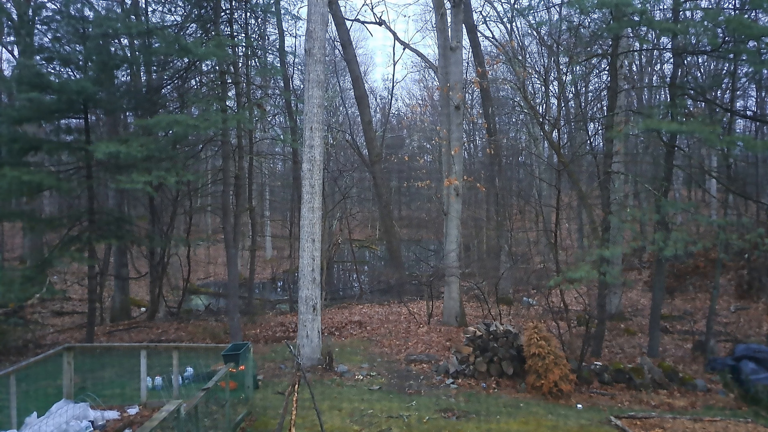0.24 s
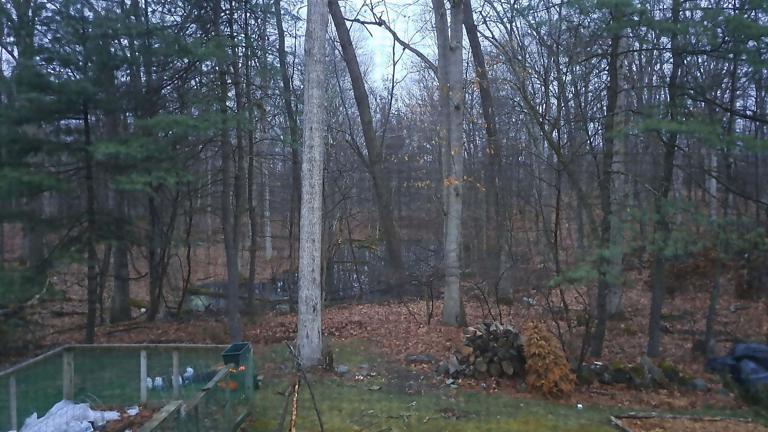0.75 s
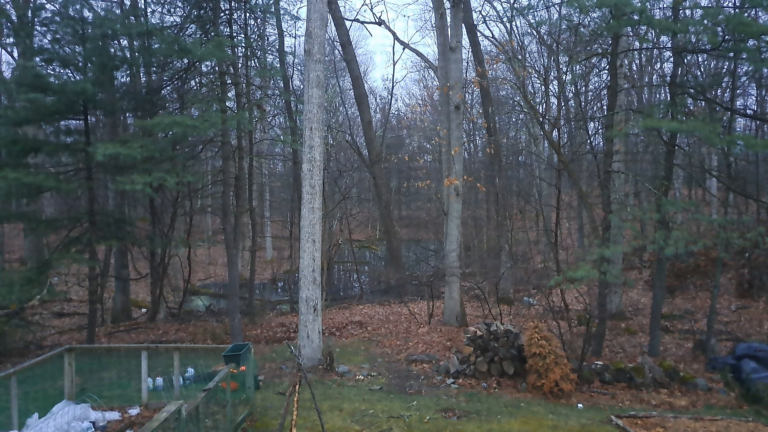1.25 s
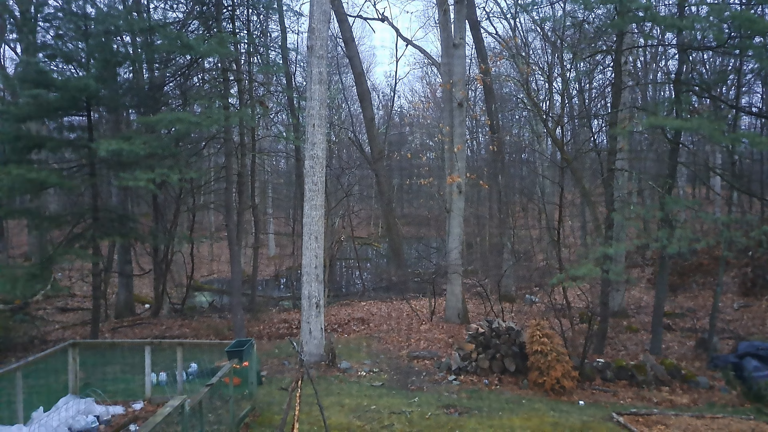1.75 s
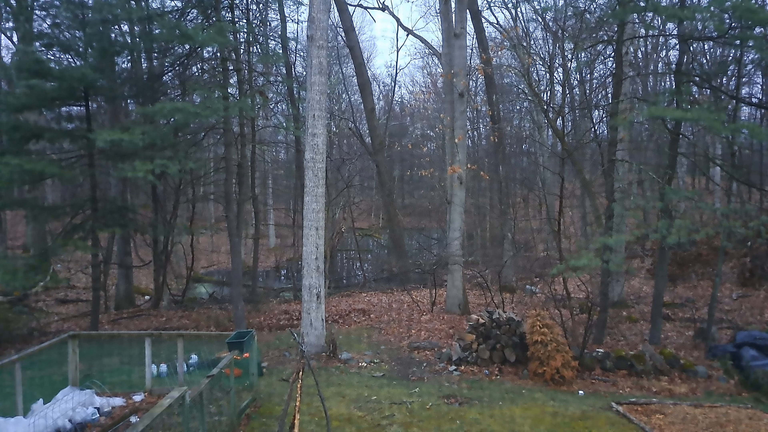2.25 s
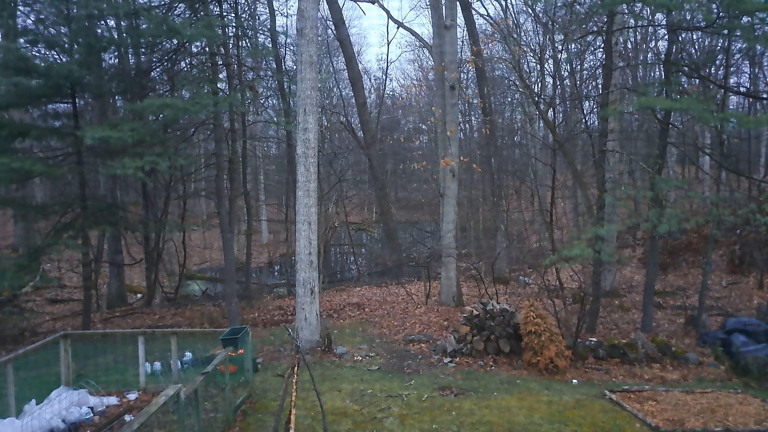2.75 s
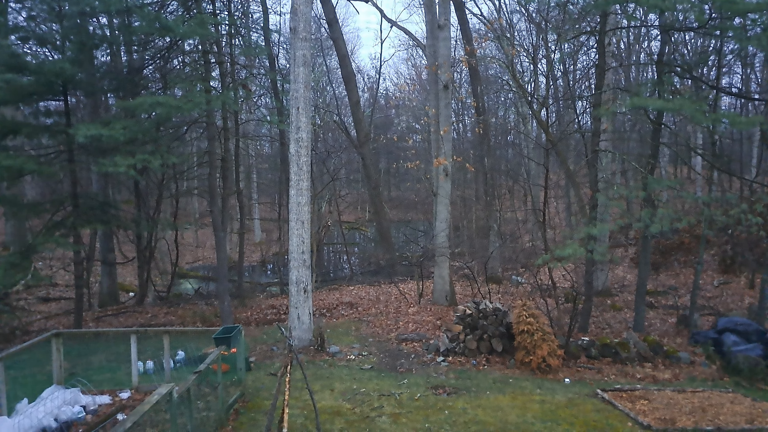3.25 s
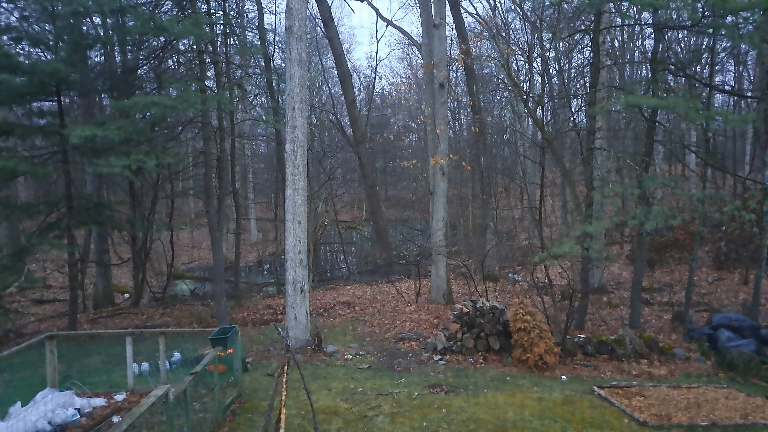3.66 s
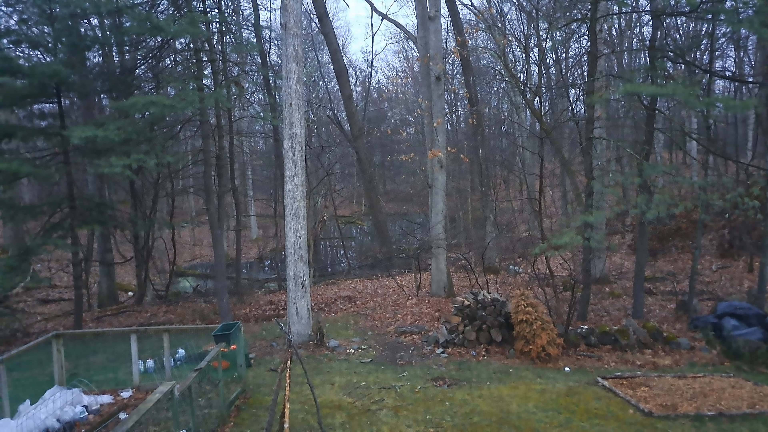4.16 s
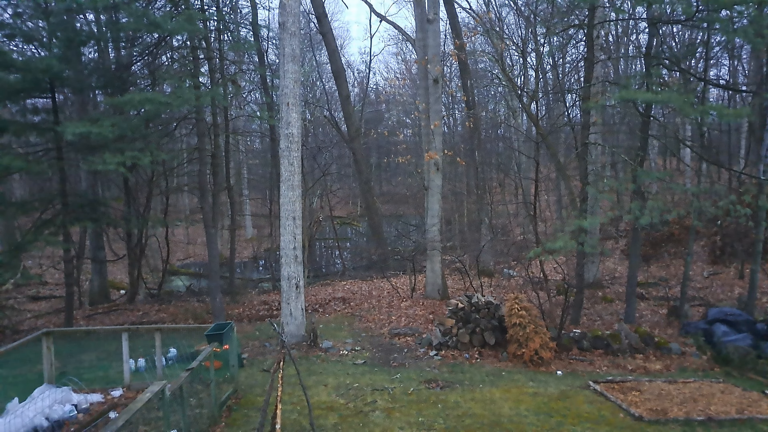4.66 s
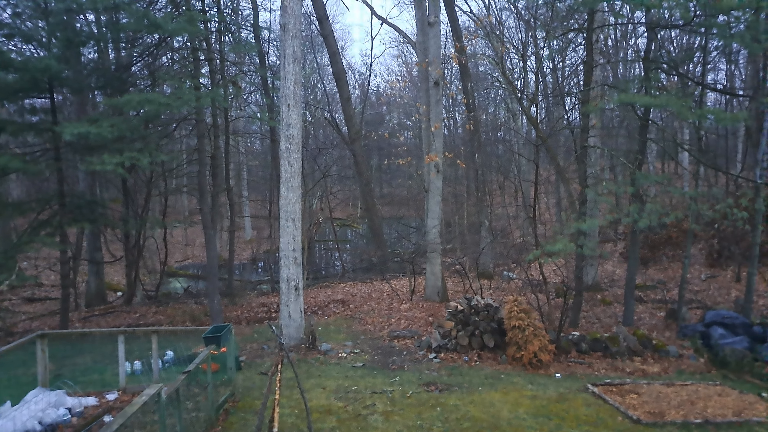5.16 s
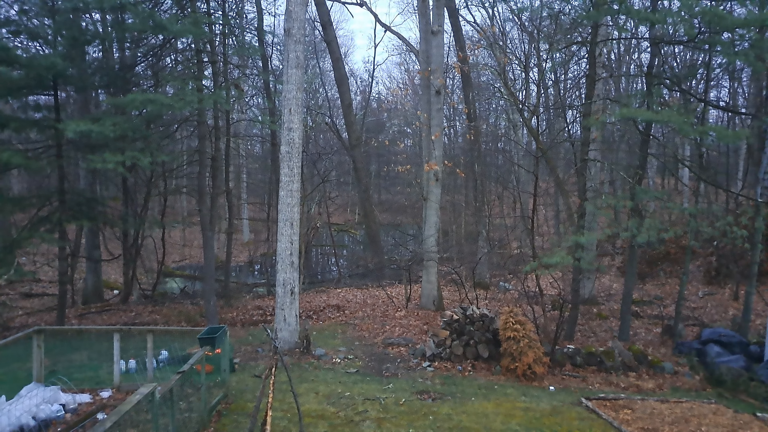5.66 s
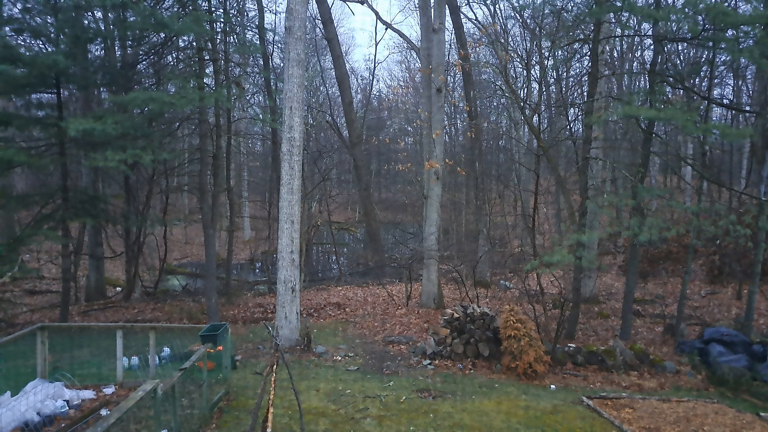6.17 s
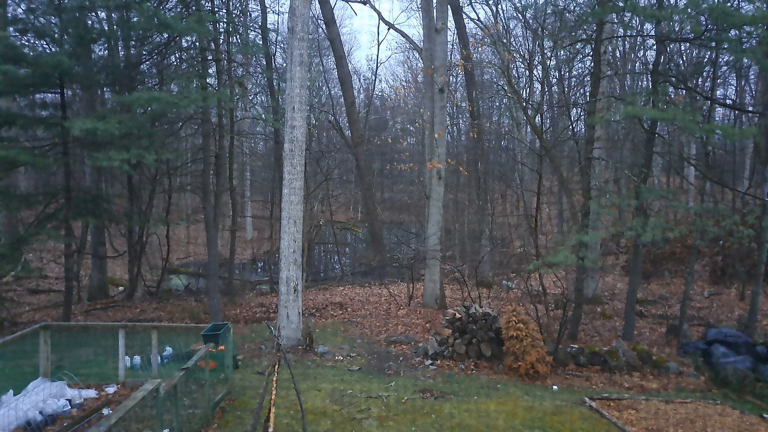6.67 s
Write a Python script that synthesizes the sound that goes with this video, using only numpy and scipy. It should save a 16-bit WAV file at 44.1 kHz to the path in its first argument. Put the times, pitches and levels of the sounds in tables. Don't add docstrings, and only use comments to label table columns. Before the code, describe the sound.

Rising bird whistles, sharp high chips and a steady run of low notes ring among trees above a soft wavering drone.

```python
import sys
import numpy as np
from scipy import signal
from scipy.fft import rfft, irfft, next_fast_len
from scipy.io import wavfile
from scipy.ndimage import uniform_filter1d

SR = 44100
rng = np.random.default_rng(int(sys.argv[2]) if len(sys.argv) > 2 else 0)


def to_wav(sig):
    pcm = np.clip(np.atleast_2d(sig), -1, 1) * 32767
    pcm = np.round(pcm).astype(np.int16)
    wavfile.write(sys.argv[1], SR, pcm.T)


def invert_db(x):
    u = np.asarray(x, float) / 20
    return 10 ** u


N = 305613


def evened(x):
    return x / np.sqrt(np.mean(x ** 2) + 1e-20)


def read(points, hz):
    f, value = np.transpose(points)
    return np.interp(np.log(hz + 1), np.log(f + 1), value)


def add(mix, s, sound):
    part = mix[:, round(s * SR):][:, :sound.shape[1]]
    part += sound[:, :part.shape[1]]


def resonate(x, hz, width):
    turn = np.exp(2j * np.pi * hz * np.arange(x.shape[-1]) / SR)
    r = np.exp(-np.pi * width / SR)
    return 2 * (turn * signal.lfilter([(1 - r) ** 2], [1, -2 * r, r * r], x / turn)).real


def sung(shape, events):
    return [[(s + t, k * hz, left + db[0], right + db[-1]) for t, hz, *db in shape]
            for s, k, left, right in events]


# (frequency [Hz], 60 dB decay time [s])
WOOD_DECAY = [(1500, .6), (2200, 1.1), (3000, .8), (7000, .67), (14000, .42)]


def wood(x, feed, wet_db, echo_db):
    hz, t, z = signal.stft(rng.standard_normal((2, SR)), SR, nperseg=256)
    tail = signal.istft(z * invert_db(-60 * t / read(WOOD_DECAY, hz)[:, None]), SR, nperseg=256)[1][:, :SR]
    tail = tail * (1 - np.exp(-np.arange(SR) / (0.0017 * SR)))
    tail = invert_db(wet_db) * tail / np.linalg.norm(tail[0])
    late = (np.geomspace(40, 700, num=12) * rng.uniform(.85, 1.2, (2, 12))).astype(int)
    echoes = invert_db(echo_db) * rng.choice([-1., 1.], late.shape) * (40 / late) ** .4
    np.put_along_axis(tail, late, echoes, 1)
    size = next_fast_len(N + SR)
    crossed = feed + 0.091 * feed[::-1]
    return x + irfft(rfft(crossed, size) * rfft(tail, size), size)[:, :N]


SCATTER_EVEN_S = .08


def bird(notes, lag, wet_db, echo_db, partials=((1, 0, 0),), rough=0.0097, edge=0.0009, glide=0.0013):
    out, feed = np.zeros((2, 2, N))
    for rows in notes:
        s, hz, left, right = np.transpose(rows)
        t = np.arange(s[0], s[-1], 1 / SR)
        pitch = uniform_filter1d(np.interp(t, s, hz), round(glide * SR), mode="nearest")
        rise = np.log2(pitch / pitch[0])
        waver = evened(uniform_filter1d(rng.standard_normal(SR // 2), 60))[:len(t)]
        pitch = pitch * (1 + rough * waver)
        turns = np.cumsum(pitch) / SR - np.outer([lag, 0], pitch) / SR
        tone = sum(invert_db(db + tilt_db * rise) * np.sin(2 * np.pi * k * turns) for k, db, tilt_db in partials)
        fade = np.clip(np.minimum(t - t[0], t[-1] - t) / edge, 0, 1)
        voice = np.sqrt(2) * tone * fade
        level_db = np.array([np.interp(t, s, left), np.interp(t, s, right)])
        even_db = uniform_filter1d(level_db, size=round(SCATTER_EVEN_S * SR), mode="reflect")
        add(out, s[0], voice * invert_db(level_db))
        add(feed, s[0], voice * invert_db(even_db))
    return wood(out, feed, wet_db, echo_db)


AIR_DB = -52
MIC_GAP = .2
# (frequency [Hz], level [dB per Hz])
TRAFFIC = [(12, -49), (20, -30), (36, -24.5), (50, -0.5), (80, -6), (202, -7.5), (428, -18), (492, -24.5),
           (812, -31.5), (1200, -42.5)]
# (frequency [Hz], level [dB per Hz])
CANOPY = [(2090, -47.5), (2760, -38), (3550, -41), (6370, -45), (9410, -59.5), (12400, -48.5), (15500, -54)]
# (frequency [Hz], left over right [dB])
AIR_BALANCE = [(60, -1.5), (180, -0.5), (550, 1.5), (1650, 5), (4970, 1.5), (15000, -4)]
# (frequency [Hz], width [Hz], left level [dB], right level [dB])
CHORUS = [(2670, 380, -71.5, -74), (4540, 1500, -101, -86), (6780, 2060, -80.5, -77)]
# (time [s], level [dB])
BUSTLE = [(0.0, -74.5), (0.77, -83), (1.49, -69), (1.89, -84.5), (2.05, -82.5), (2.889, -75.5),
          (3.24, -84.5), (4.03, -76), (4.52, -83), (4.67, -74.5), (5.46, -82.5), (6.351, -69),
          (6.54, -82.5), (6.93, -87.5)]
# (frequency [Hz], share [1])
BUSTLE_SHARE = [(1500, 0.16), (2700, 0.23), (4500, 1.2), (6500, 0.36), (9000, 0.13)]


def air():
    frames, hz = N // 512 + 5, np.fft.rfftfreq(2048, 1 / SR)
    a, b, c, d, patches = rng.standard_normal((frames, 1025, 5)).T
    patches = evened(uniform_filter1d(uniform_filter1d(patches, 30, 0), 8, 1))
    same = np.sinc(2 * hz * MIC_GAP / 343)[:, None]
    left = a + 1j * b
    z = np.array([left, same * left + np.sqrt(1 - same ** 2) * (c + 1j * d)])
    side_db = np.multiply.outer([.5, -.5], read(AIR_BALANCE, hz))[:, :, None]
    s, level_db = np.transpose(BUSTLE)
    busy_db = np.interp(np.arange(frames) * 512 / SR, s, level_db - level_db.mean())
    bustle_db = np.outer(read(BUSTLE_SHARE, hz), busy_db)
    wash_db = read(TRAFFIC + CANOPY, hz)[:, None] + side_db + 1.45 * patches + bustle_db
    wash = signal.istft(z * invert_db(wash_db), nperseg=2048, noverlap=1536)[1][:, :N]
    far = z[:, :, ::-1] * invert_db(4 * patches + bustle_db)
    far = signal.istft(far, nperseg=2048, noverlap=1536)[1][:, :N]
    chorus = sum(invert_db([[left], [right]]) * evened(resonate(far, f, w)) for f, w, left, right in CHORUS)
    return invert_db(AIR_DB) * evened(wash) + chorus


DRONE_HZ, DRONE_REST_DB = 68, -68
# (crest time [s], level [dB], half length [s])
SWELLS = [(.16, -46, 0.078), (0.345, -47.5, .1), (0.597, -47, 0.099), (0.787, -52, .07),
          (1.094, -49.5, 0.12), (1.378, -43.5, 0.087), (1.572, -46, 0.076), (1.838, -51, 0.077),
          (2.172, -53.5, 0.17), (2.361, -48, 0.093), (2.815, -49, 0.074), (3.14, -48.5, 0.17),
          (3.416, -50.5, 0.069), (3.652, -51, 0.039), (3.825, -51, 0.042), (4.11, -47, .06),
          (4.283, -52, 0.097), (4.624, -45, 0.044), (4.84, -45, 0.05), (5.38, -55, 0.11),
          (5.804, -49, 0.16), (6.212, -44, 0.028), (6.417, -49, 0.14), (6.624, -52.5, 0.14),
          (6.858, -51.5, 0.032)]


def drone():
    t = np.arange(0, N + 256, 256) / SR
    swells = sum(invert_db(db) * np.exp(-((t - s) / half) ** 2) for s, db, half in SWELLS)
    level = np.interp(np.arange(N) / SR, t, invert_db(DRONE_REST_DB) + swells)
    drift, flutter = (evened(uniform_filter1d(uniform_filter1d(v, 2500), 2500))
                      for v in rng.standard_normal((2, N)))
    turns = np.cumsum(DRONE_HZ + 3.99 * drift) / SR
    orders = np.sin(2 * np.pi * turns) + invert_db(-15 + 6.0 * flutter) * np.sin(4 * np.pi * turns)
    return np.sqrt(2) * level * invert_db([[-.5], [.5]]) * orders


# (time [s], length [s], centre [Hz], left level [dB], right level [dB])
FAR_NOTES = [
    (0.3, 0.2, 3850, -82, -78),
    (1.07, 0.27, 4620, -84, -75.5),
    (0.206, 0.14, 7600, -89, -79),
    (3.048, .19, 3136, -66, -69.5),
    (4.23, 0.079, 4060, -90, -85),
    (5.871, 0.079, 4050, -86, -78),
    (6.387, 0.13, 3930, -77, -78),
]
FAR_CHIRPS = [(0, 0.032, 6560, -69, -55.5), (0, 0.036, 2680, -48.5, -49), (.1, 0.21, 2880, -56, -56),
              (.36, 0.33, 2700, -68.5, -71.5), (1.438, 0.16, 4700, -71.5, -65.5),
              (2.08, 0.14, 7640, -90, -77.5), (2.607, 0.036, 5300, -77, -65.5),
              (4.66, 0.066, 1344, -72, -78), (6.078, 0.034, 6950, -86, -67), (6.305, 0.037, 7080, -77, -60),
              (2.759, 0.3, 3620, -86, -75.5), (2.13, .18, 3500, -81, -85), (2.34, 0.14, 4230, -78, -76.5),
              (5.56, .12, 5060, -80, -76), (3.75, 0.87, 3780, -89, -81.5), (4.176, 0.032, 7600, -88, -74),
              (5.39, .08, 9700, -82, -88)]
FAR_CHATTER = [
    (2.652, 0.053, 7300, -85, -68),
    (1.3, 0.34, 3730, -80, -72),
    (6.2, 0.025, 1940, -68.5, -68),
]
RUSTLES = [
    (4.475, 0.071, 3800, -66.5, -66),
    (4.557, 0.12, 5700, -78, -76),
    (2.8, .006, 9100, -80, -77),
]
BLUR_WIDTHS = (.05, .12, .21, .95)


def blurs():
    out = np.zeros((2, N))
    for rows, share in zip((FAR_NOTES, FAR_CHIRPS, FAR_CHATTER, RUSTLES), BLUR_WIDTHS):
        for s, length, hz, left, right in rows:
            puff = evened(resonate(rng.standard_normal((2, round(length * SR))), hz, share * hz))
            swell = np.hanning(puff.shape[1] + 2)[1:-1] ** .5
            add(out, s, puff * swell * invert_db([[left], [right]]))
    return wood(out, out, wet_db=3.5, echo_db=-13.0)


FAINT = dict(lag=-11, wet_db=-0.5, echo_db=-15.5, rough=.005, edge=0.0027)
# (time [s], pitch [Hz], left level [dB], right level [dB])
STRAYS = [
    [(1.998, 1981, -67.5, -71), (2.045, 2035, -58, -67)],
    [(.665, 6470, -88, -72), (.745, 6570, -84, -77)],
    [(5.59, 3250, -74, -80), (5.65, 2670, -71, -80)],
    [(.005, 2664, -56, -64), (.045, 2620, -57, -62), (.1, 2798, -48.5, -62), (.16, 2960, -48, -51),
     (.2, 2980, -51, -61), (.25, 3000, -64, -65)],
    [(.003, 3970, -77, -78), (.12, 4000, -83, -82), (.2, 3960, -88, -88)],
    [(.165, 4450, -80, -71), (.23, 4730, -80, -73)],
    [(2.8, 3950, -76, -84), (2.89, 3936, -78, -85), (3.1, 3920, -89, -84)],
    [(5.575, 4290, -77, -85), (5.68, 4220, -80, -84)],
    [(6.422, 7400, -82, -59), (6.432, 5000, -77, -67), (6.447, 3600, -73, -72)],
    [(6.562, 4650, -80, -78), (6.575, 4000, -80, -79)],
]


def strays():
    return bird(STRAYS, **FAINT)


# (time from start [s], pitch [Hz], left level [dB], right level [dB])
SLUR_NEAR = [(.01, 2032, -57, -73), (.045, 2060, -64, -57.5), (.062, 2096, -53.5, -51),
             (.095, 2440, -41.5, -44.5), (.12, 2570, -33, -53), (.14, 2650, -51, -41),
             (.158, 2645, -47, -33.5), (.19, 2712, -30.5, -52.5), (.215, 2684, -49.5, -50)]
SLUR_FAR = [(.03, 2060, -70, -84), (.06, 2120, -59, -72), (.085, 2260, -58, -62), (.12, 2470, -66, -62),
            (.156, 2600, -63, -66), (.19, 2670, -55, -55), (.215, 2685, -56, -58), (.23, 2680, -64, -70)]
# (time [s], pitch factor [1], left gain [dB], right gain [dB])
SLURS_NEAR = [
    (2.25, 0.99, -2.2, -0.95),
    (2.6, 0.99, -0.24, -0.2),
]
SLURS_CUT = [
    (2.01, 0.98, -0.7, -4.5),
    (2.945, .99, -10, -18),
]
SLURS_FAR = [
    (.184, 1.0, 2, 3),
    (3.185, 1.0, 1, 0),
    (3.546, 1.0, -1, -1),
]


def slurs():
    notes = sung(SLUR_NEAR, SLURS_NEAR) + sung(SLUR_NEAR[:4], SLURS_CUT) + sung(SLUR_FAR, SLURS_FAR)
    return bird(notes, lag=4.9, wet_db=-4.0, echo_db=-17, rough=0.0048, edge=0.0034, glide=0.008)


# (time from start [s], pitch [Hz], level [dB])
WARBLE_IN = [(0, 7900, -18.5), (.008, 7030, -10), (.018, 6110, -9), (.026, 6350, -16), (.033, 6800, -0.5),
             (.044, 8000, -16)]
WARBLE = [(.05, 7950, -18), (.068, 6750, 4.5), (.08, 5900, -6), (.092, 5710, -12), (.106, 6476, 6),
          (.118, 7350, -4.5), (.128, 7580, -12.5), (.141, 6800, 3), (.157, 5300, -2.5)]
# (time [s], pitch factor [1], left level [dB], right level [dB])
WARBLES = [
    (3.376, 1.006, -65, -52),
    (0.791, 1.0, -65.5, -54.5),
    (2.315, 1.0, -60, -48),
]


def warbles():
    notes = sung(WARBLE_IN, WARBLES) + sung(WARBLE, WARBLES)
    return bird(notes, lag=12.3, wet_db=-7, echo_db=-5, rough=.014, edge=.004, glide=.005)


# (time from start [s], pitch [Hz], left level [dB], right level [dB])
GLIDE_OPEN = [(.022, 2750, -63, -72), (.038, 2795, -50, -66), (.058, 2835, -58, -62),
              (.082, 2940, -48, -53), (.102, 2975, -53, -52), (.125, 3015, -48, -49), (.15, 3070, -54, -52),
              (.18, 3135, -48, -52), (.222, 3155, -54, -50)]
GLIDE_CLOSE = [(.035, 2735, -66, -74), (.056, 2760, -41, -51), (.074, 2795, -44, -47),
               (.092, 2835, -56, -54), (.113, 2885, -43, -41), (.134, 2945, -48, -47),
               (.163, 3000, -36, -37), (.186, 3055, -46, -43), (.212, 3090, -45, -46)]
LATE_START = [(.045, 2745, -64, -72), (.062, 2765, -47, -57), (.078, 2790, -41, -46),
              (.097, 2855, -59, -59)]
GLIDE_TOP = [(.14, 4590, -89, -78.5), (.16, 4660, -80, -67), (.19, 4745, -82.5, -70.5),
             (.225, 4790, -92.5, -72.5)]
GLIDE_SLOW = [(.014, 2770, -55, -76), (.05, 2870, -60, -59), (.085, 2933, -51, -55), (.104, 2970, -68, -65),
              (.12, 2974, -56, -54), (.16, 3035, -60, -58.5), (.25, 3120, -59.5, -61),
              (.39, 3120, -62, -68)]
# (time [s], pitch factor [1], left gain [dB], right gain [dB])
GLIDES_OPEN = [
    (2.814, 1, 0, -.5),
    (3.72, 1, -.8, -.8),
    (4.76, 1, 0.1, 0.1),
    (6.022, 1, -.7, -.2),
]
GLIDES_CLOSE = [
    (2.574, 1, 0, 0),
    (5.05, 1, 0, 0),
    (6.201, 1, 0, 0),
]
GLIDES_LATE = [
    (1.266, 1, 0, 0),
    (3.99, 1, -1, -1),
]
GLIDES_SLOW = [
    (0.94, 0.998, -0.11, -.1),
]


def glides():
    near = (sung(GLIDE_OPEN, GLIDES_OPEN) + sung(GLIDE_CLOSE, GLIDES_CLOSE)
            + sung(LATE_START + GLIDE_CLOSE[4:-1], GLIDES_LATE))
    faint = sung(GLIDE_TOP, GLIDES_OPEN) + sung(GLIDE_SLOW, GLIDES_SLOW)
    return bird(near, lag=-5, wet_db=-7.5, echo_db=-22, rough=.003, edge=.004,
                partials=((1, 0, 0), (1.5, -53, 110), (2, -42, 20))) + bird(faint, **FAINT)


CHIP_START_HZ = 5300
# (time [s], top pitch [Hz], bend time [s], left level [dB], right level [dB])
CHIPS = [
    (1.071, 8230, .015, -63, -42),
    (3.017, 7080, 0.0062, -56, -40),
    (5.173, 6980, 0.00584, -61.5, -46),
]
# (time from start [s], level [dB])
CHIP_EFFORT = [(0, -29.5), (.0065, 3.5), (.014, -5), (0.022, -4), (.029, -4)]


def chip_notes(brighten=0, thin_db=0, count=5):
    loudest, lowest = max(row[-1] for row in CHIPS), min(row[1] for row in CHIPS)
    notes = []
    for s, top_hz, bend, left, right in CHIPS:
        overtone_db = brighten * (right - loudest) + thin_db * (top_hz - lowest) / 1000
        notes.append([(s + t, top_hz - (top_hz - CHIP_START_HZ) * np.exp(-t / bend),
                       left + db + overtone_db, right + db + overtone_db) for t, db in CHIP_EFFORT[:count]])
    return notes


def chips():
    body = bird(chip_notes(), lag=-15.0, wet_db=-1.5, echo_db=-17.0, partials=((0.99, 0.55, 0.43),),
                rough=0.0081, edge=0.0017)
    overtone = bird(chip_notes(brighten=.3, thin_db=-4.5, count=3), lag=-15.0, wet_db=8, echo_db=-4,
                    partials=((2, -10, -12),), rough=.025, edge=0.002)
    return body + overtone


# (time from start [s], pitch [Hz], level [dB])
HOOK = [(0, 5800, -12), (.011, 6420, -2), (.019, 6200, -3), (.027, 5980, 0), (.035, 6250, -1),
        (.042, 7400, -6)]
HOOK_LOW = [(-.022, 2500, -20), (0, 3160, -5), (.008, 2760, -3), (.018, 2600, -1), (.027, 2800, -3),
            (.034, 3300, -5), (.041, 4100, -13), (.05, 4000, -17), (.066, 2350, -13)]
# (time [s], pitch factor [1], left level [dB], right level [dB])
HOOKS = [
    (1.767, 0.97, -66, -58),
    (4.525, 1.02, -74, -59),
    (5.825, 1.0, -65, -55.5),
]
HOOKS_LOW = [
    (1.771, 1.02, -55.5, -64),
    (4.535, 1.13, -56.5, -66),
    (5.833, 1.0, -54.5, -61),
    (6.085, 1.04, -52, -54.5),
]
# (time [s], pitch [Hz], left level [dB], right level [dB])
FLICKS = [
    [(1.305, 5670, -76, -57.5), (1.332, 5000, -72, -65)],
    [(5.872, 7750, -74, -51), (5.88, 4900, -74, -61)],
    [(4.025, 7900, -91, -76), (4.047, 6000, -83, -74)],
    [(3.76, 5800, -88, -72), (3.785, 4990, -82, -67)],
    [(2.085, 7700, -84, -75), (2.105, 6600, -81, -77)],
    [(2.15, 7900, -86, -72), (2.17, 6760, -80, -71)],
    [(6.675, 2750, -72, -76), (6.7, 3260, -75, -78), (6.725, 3456, -74.5, -78), (6.742, 3200, -71, -76),
     (6.753, 2230, -60, -66)],
]


def hooks():
    notes = sung(HOOK, HOOKS) + sung(HOOK_LOW, HOOKS_LOW) + FLICKS
    return bird(notes, lag=12.3, wet_db=-6, echo_db=-13, rough=.012, edge=.003,
                partials=((1, 0, 0), (2, -18, 0)))


# (time from start [s], pitch [Hz], level [dB])
FALL = [(.003, 1900, -5), (.022, 1920, 1), (.032, 1800, 4), (.044, 1500, 0)]
FALL_FLICK = [(0, 3000, -12), (.015, 3350, -10), (.034, 3300, -7), (.042, 2950, -4), (.052, 2200, -3)]
# (time [s], pitch factor [1], left level [dB], right level [dB])
FALLS = [
    (1.383, 0.85, -72, -71),
    (2.92, 0.94, -69, -82),
    (4.098, 1, -61.5, -71),
    (4.992, 0.95, -71, -81),
    (5.244, 0.9, -59.5, -63),
    (5.483, 0.92, -62.5, -70),
    (6.7, 0.94, -57, -65.5),
]


def falls():
    notes = sung(FALL, FALLS) + sung(FALL_FLICK, FALLS)
    return bird(notes, lag=12.3, wet_db=-9, echo_db=-14, rough=.02, edge=.003)


# (time [s], peak level [dB], size [1])
TICK = [
    (4.72, -48, 1),
]


def tick():
    out, t = np.zeros((2, N)), np.arange(600) / SR
    push = -np.sin(2 * np.pi * 250 * t) * (t < .004)
    rings = sum(g * np.sin(2 * np.pi * hz * t) * np.exp(-t / .0018)
                for hz, g in ((900, -.45), (1450, -.4), (2300, -.3)))
    for s, db, size in TICK:
        add(out, s, invert_db(db) * (3 * size * push + 2.0 * rings) * np.array([[1], [.6]]))
    return out


# (time from start [s], pitch [Hz], level [dB])
ARCH = [(.016, 1970, -16), (.034, 2080, -11), (.052, 2135, -3), (.067, 2155, 1), (.08, 2135, -5),
        (.092, 1720, -9)]
UNDER_ARCH = [(.014, 1960, -7), (.035, 2060, -2), (.06, 2140, 0), (.082, 2150, -4)]
# (time [s], pitch factor [1], left level [dB], right level [dB])
ARCHES = [
    (5.442, 1.0, -61, -60),
    (5.6, 1.0, -60, -57),
    (5.764, 1.0, -59, -57),
    (5.932, 1.0, -59, -57),
    (6.098, 1.0, -57, -56),
    (6.268, 1.0, -57, -56),
    (6.43, 1.0, -58, -57),
    (6.592, 1.0, -62, -61),
    (6.764, 0.98, -64, -64),
]


def arches():
    under = sung(UNDER_ARCH, [(s, k * 2 / 3, -73, -80) for s, k, *_ in ARCHES])
    return (bird(sung(ARCH, ARCHES), lag=17.7, wet_db=-3.5, echo_db=-12, rough=.017, edge=.004,
                 partials=((1, 0, 0), (4 / 3, -24, 0)))
            + bird(under, lag=13, wet_db=-14, echo_db=-11, rough=.016, edge=.006))


# (time from start [s], pitch [Hz], level [dB])
SEET = [(0.0, 6990, -9), (.006, 7200, -0.5), (0.022, 7180, 3.5), (0.032, 7400, -1), (0.043, 7670, -2.5)]
# (time [s], pitch factor [1], left level [dB], right level [dB])
SEETS = [
    (6.385, 0.99, -67, -38.5),
]


def seet():
    return bird(sung(SEET, SEETS), lag=-12.5, wet_db=-15, echo_db=-22, partials=((1, 0, 0), (2, -45, 0)),
                rough=.003, edge=.003)


def scene():
    background = air() + drone() + blurs()
    whistles = strays() + slurs() + warbles() + glides()
    calls = chips() + hooks() + falls() + arches() + seet()
    return background + whistles + calls + tick()


def masked(x, below_db, reach_hz):
    hz, t, z = signal.stft(x, SR, nperseg=1024)
    power = uniform_filter1d(abs(z) ** 2, size=5, axis=1)
    fall = np.exp(-hz[1] / reach_hz)
    whistle_band = ((hz > 1500) & (hz < 3600))[:, None]
    shadow = signal.lfilter([1 - fall], [1, -fall], power * whistle_band, axis=1)
    kept = uniform_filter1d(1. * (power > shadow * invert_db(2 * below_db)), size=3, axis=2)
    return signal.istft(z * kept, SR, nperseg=1024)[1][:, :N]


def low_pass(x):
    return signal.sosfilt(signal.butter(12, 15680, fs=SR, output="sos"), x)


def record(dry):
    holed = masked(dry, below_db=-23, reach_hz=350)
    return low_pass(holed)


dry = scene()
out = record(dry)
to_wav(out)
```